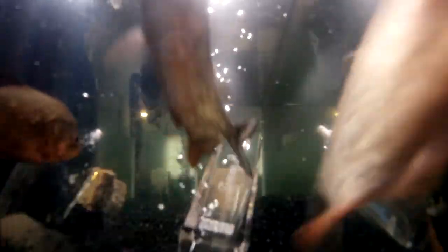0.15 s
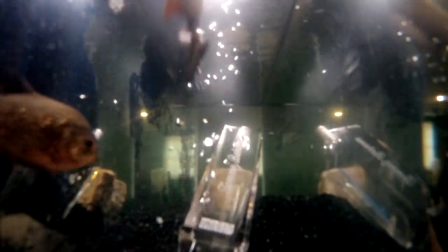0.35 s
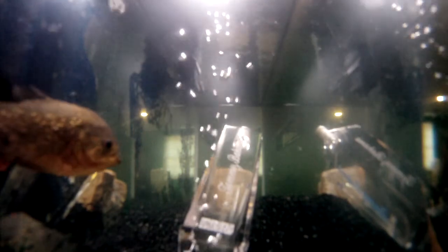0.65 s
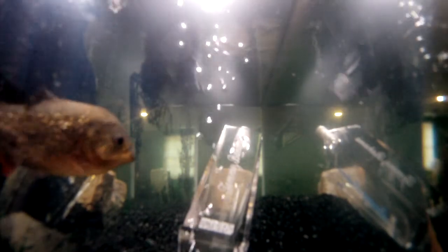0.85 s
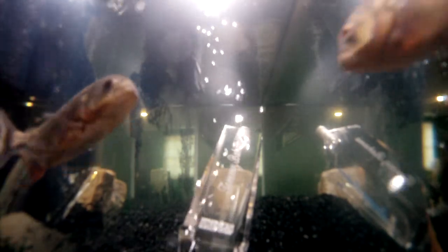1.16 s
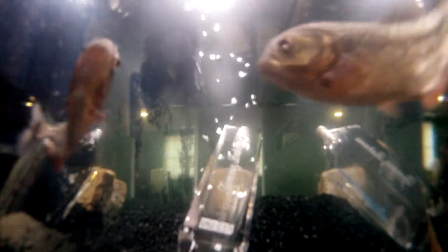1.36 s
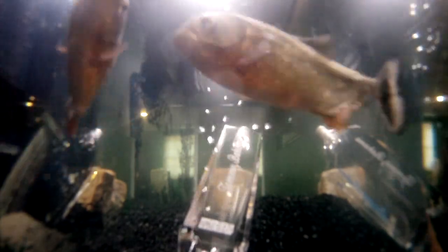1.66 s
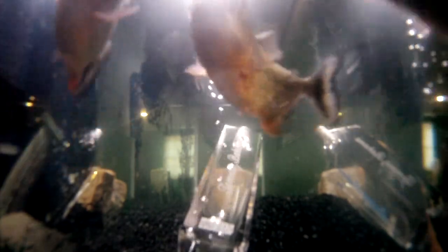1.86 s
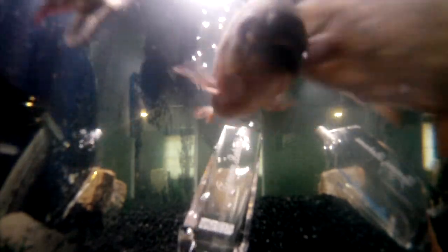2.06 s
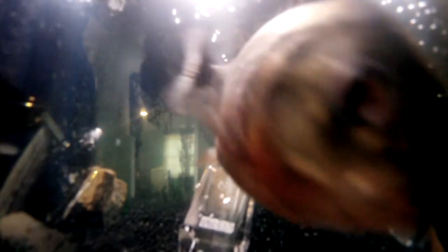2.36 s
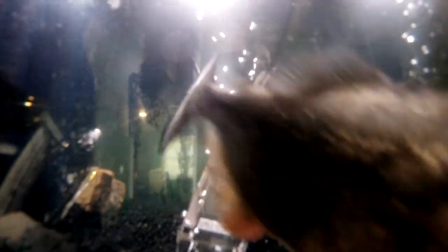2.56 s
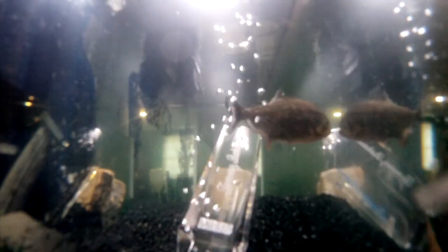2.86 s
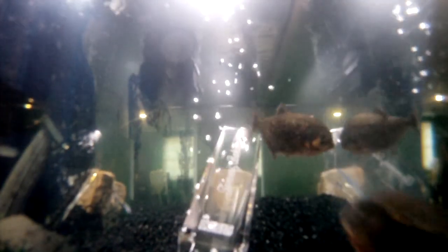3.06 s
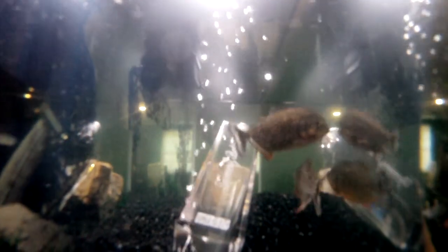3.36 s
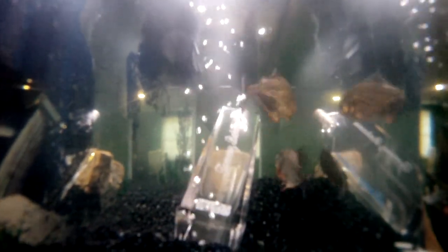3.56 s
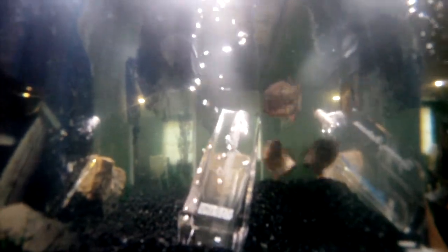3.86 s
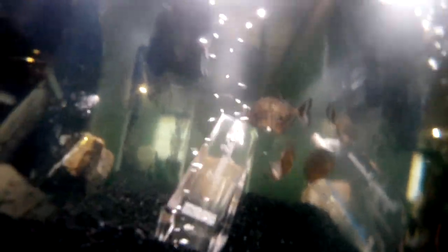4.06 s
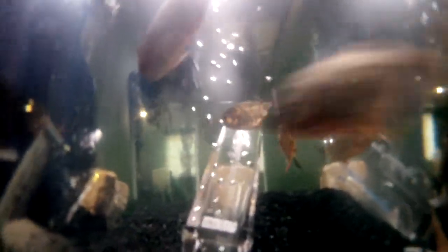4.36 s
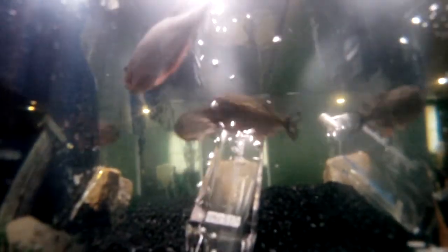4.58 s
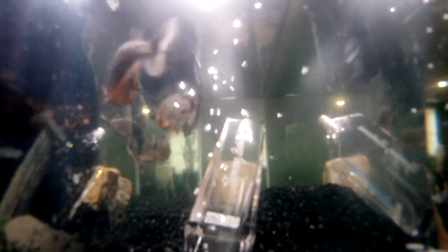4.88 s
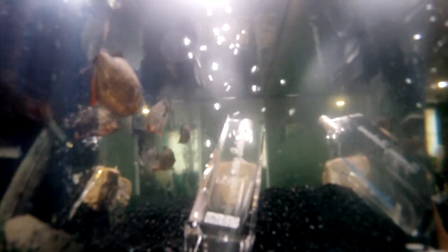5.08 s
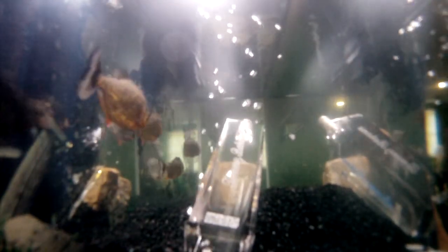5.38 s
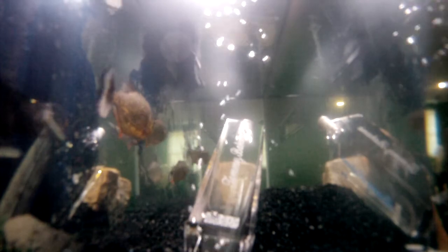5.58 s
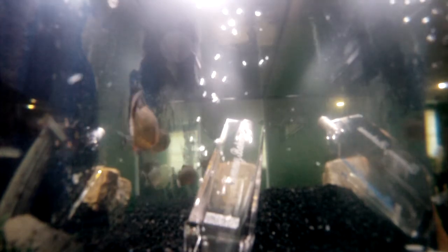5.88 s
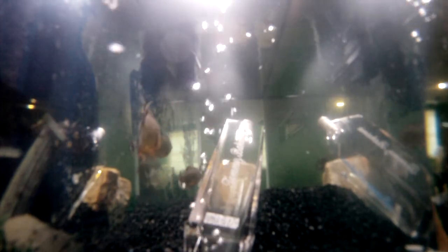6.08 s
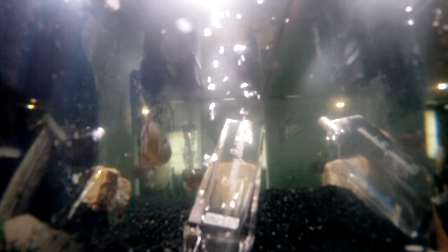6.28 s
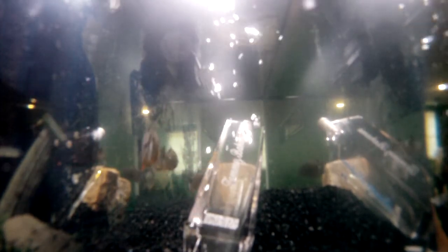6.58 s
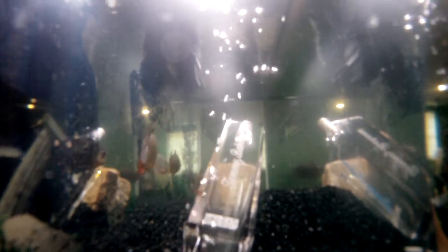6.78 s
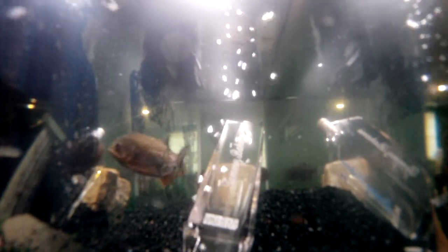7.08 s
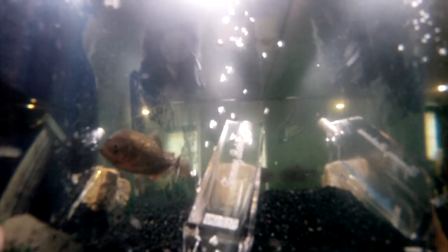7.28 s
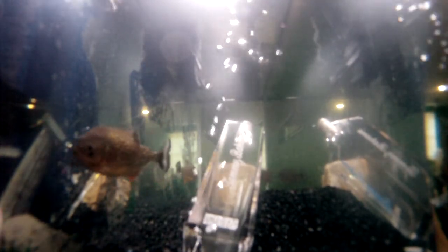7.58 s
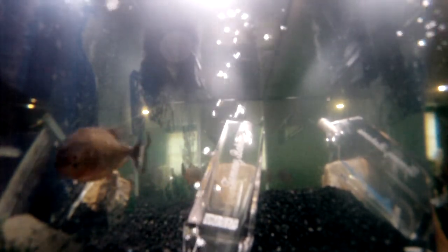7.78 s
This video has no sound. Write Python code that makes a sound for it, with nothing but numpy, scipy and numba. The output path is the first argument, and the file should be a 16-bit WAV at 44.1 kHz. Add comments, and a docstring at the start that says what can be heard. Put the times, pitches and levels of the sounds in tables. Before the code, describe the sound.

A pump motor drones continuously in an aquarium, its whine overlaid by dense dry ticking that swells and fades every second or so. Bubbles and flowing water form a murky bed. A small knock comes first, then scratchy rubs, bumps and a huge dull thud against the microphone case, followed by soft low thuds. The pump settles back to its steady rattling hum. Muffled, close, slightly distorted underwater pickup.

```python
"""A steady hum and six-vane impeller whine run throughout, with a loose rotor ticking once a turn.
The microphone hangs in a sealed housing in the fish tank, with the induction-motor pump running.
The hum and whine are sines locked to mains and rotor; ticks, knocks and bubbles are ringing modes; flow is noise.
Midway the housing is bumped and rubbed. Some loud ticks add a bright overload click, fast gain control
ducks after each peak, and a sample-hold puts mirror images of the sound high up."""
import sys
import numpy as np
from scipy import signal
from scipy.fft import rfft, irfft
from scipy.io import wavfile
from numba import njit

SR = 44100
rng = np.random.default_rng(int(sys.argv[2]) if len(sys.argv) > 2 else 0)


def unload_wav(signal):
    """Save mono or channel-first audio to the path in sys.argv[1] as 16-bit WAV at rate SR, clipped to [-1, 1]."""
    wavfile.write(
        sys.argv[1],
        SR,
        np.round(np.clip(np.atleast_2d(signal).T, -1, 1) * 32767).astype(np.int16),
    )


def voltage_ratio(decibels):
    """Convert decibels (scalar or array-like) to amplitude ratios, 20 dB per decade."""
    exponent = np.asarray(decibels, float) / 20
    return 10 ** exponent


N = 349697
TIME = np.arange(N) / SR   # s

# Every level below is set ahead of the recorder's filters and gain control.
# Rotor speed, with a brief sag after the big knock: start_s, speed_turns_per_s
ROTOR_SPEED = [(0, 52.7384), (4.03, 52.732), (4.28, 52.5245), (4.55, 52.7715), (7.93, 52.7491)]
# Steady tones of rotor and magnetic pull: turn_rate_multiple, pull_rate_multiple
TONE_ORDERS = [(0, 1 / 2), (0, 1), (0, 3 / 2), (0, 2), (0, 3), (0, 4), (1, 2), (6, 0), (6, 1), (12, 0),
               (12, 1), (13, 0), (18, 0), (18, 1), (19, 0), (23, 0), (24, 0), (24, 1), (25, 0), (25, 1),
               (26, 1), (27, 0), (28, 0), (30, -1), (30, 0), (35, 0), (36, 0), (36, 1), (48, 0), (49, 0),
               (54, 0), (55, 0), (60, 0)]
# Mean level of each steady tone: level_db (rms)
TONE_LEVELS = [-30, -18.5, -31.5, -32, -30, -42.5, -40, -25.5, -43, -17.5, -41.5, -40, -32.5, -39.5, -40.5,
               -40.5, -23, -34.5, -32, -29.5, -50.5, -40, -52, -45.5, -33, -60, -27, -37, -42, -49, -55.5,
               -55, -54]
# Tones that fade while the housing is handled:
# start_s, change_of_turn_order_6_and_pull_harmonic_3_db, change_of_turn_order_12_db
HANDLING_FADES = [(3.05, 0, 0), (3.2, -4, -1), (3.38, -2, -1), (3.55, -13.5, -9.5), (3.8, -3, -2.5),
                  (4.0, -3.5, -2), (4.3, -30, -1), (4.55, -4.5, -2.5), (4.85, -1, -0.5)]
# Tick strength round one slip cycle: slip_cycles, strength_db
TICK_STRENGTH = [(.2, -15.5), (.3, -11.5), (.39, -4.5), (0.481, -8), (.56, -19.5), (.66, -11.5), (.78, -2),
                 (.88, -16.5), (.97, -8.5), (1.1, -23), (1.2, -33.5)]
# The hardest ticks; some overload the recorder, adding a bright click (-30 dB is next to none):
# start_s, strength_db, overload_click_db
HARD_TICKS = [(.0624, -3.5, -3), (.1954, -2.5, -30), (.4038, -3.5, -30), (.8209, -3, -7), (1.2552, -3, -30),
              (1.5795, -3.5, -30), (1.9206, -2, -16), (2.3375, -1.5, -18), (3.0962, -4, -30),
              (3.1139, -2.5, -9), (3.4376, -4, -14), (3.5708, -3, -30), (3.6462, -1.5, -14),
              (3.7034, -4.5, -30), (4.0796, 4, 3), (4.4628, -.5, 3), (4.5556, -2.5, -30), (4.6712, -2, -12),
              (4.8797, -2.5, -3), (4.9724, -3.5, -30), (5.1055, -3, -30), (5.2212, -2, -30),
              (5.2966, -2, -6), (5.3892, -3.5, -30), (5.4294, -3.5, -30), (5.5051, -3, -30),
              (5.7308, -2, -11), (5.9217, 0, -6), (6.1473, -2, -30), (6.2632, -3, -2), (6.6047, -3, -30),
              (6.68, -3, -30), (7.0216, -2.5, -14), (7.5714, -1.5, -8), (7.6468, -2.5, -30),
              (7.7797, -2.5, -30), (7.8554, -2.5, -30)]
# Modes a tick sets ringing: pitch_hz, t60_s
TICK_RING_MODES = [(1910, .012), (2140, .006), (2510, .011), (1450, .016), (3200, .007), (3666, .009)]
# Weight of each tick mode: level_db
TICK_MODE_LEVELS = [4, -11, -9, 1, -1.5, -8]
# Hard knocks on the housing: start_s, strength_db, pitch_hz, contact_s, snap_db
HARD_KNOCKS = [(2.5203, 0, 410, 0.0014, -52), (3.1153, 0.5, 577, 0.0027, -37),
               (3.1313, 2.5, 740, 0.00024, -10), (4.0313, 26, 632, 0.0044, -14),
               (4.0395, 19, 75.4, .006, -30)]
# Soft pushes on the housing: start_s, strength_db, pitch_hz
SOFT_THUDS = [(2.518, -5.5, 150), (3.1451, -5.5, 148), (3.3, -5.5, 100), (3.387, -8, 204), (3.427, -9, 298),
              (4.062, 5, 262), (4.151, 0, 89.5), (4.276, -15, 240), (4.338, -12, 115), (4.439, -12, 90.5)]
# Rubbing on the housing: start_s, strength_db
RUBS = [(3.063, -19), (3.088, -23), (3.105, -28), (3.127, 0.5), (3.156, -22), (3.278, -15), (3.345, -22),
        (3.386, -8.5), (3.55, -9), (3.582, -11), (3.63, -19)]
# Low rumble, louder while the housing is handled: start_s, level_db (rms)
HANDLING_RUMBLE = [(3.05, -42), (3.15, -30), (4.5, -29), (4.7, -49)]
# Flow through the tank and housing resonances: pitch_hz, width_hz, level_db (relative)
FLOW_RESONANCES = [(73, 52, -4), (274, 194, -3), (781, 218, -5.5), (1464, 486, -6.5), (1948, 460, -5.5),
                   (2503, 335, -12.5), (3596, 300, -23.5)]

PULL_HZ, PULL_START_CYCLES = 119.982, -.443   # magnetic pull, at twice the mains
START_TURNS = .0072
# The rotor strikes earlier in its turn as the pull slips ahead (turns; lead is turns per slip cycle)
TICK_ANGLE, TICK_LEAD, TICK_JITTER = .423, .285, .005
TICK_SPREAD_DB, TICK_TOP_DB = 3, -5
OVERLOAD_DELAY_S, OVERLOAD_LOW_CUT_HZ = .0012, 3000
KNOCK_T60_S = .0083
THUD_SWELL_CYCLES, THUD_T60_CYCLES = .73, 4.4
FLOW_DB, BUBBLES_DB, HISS_DB = -24, -25, -44   # rms
BUBBLES_PER_S = 580
HOLD_HZ, HOLD_STEPS = 12000, 4   # each held sample is repeated four times


def rms_one(x):
    """Scale to rms 1."""
    return x / np.sqrt(np.mean(x ** 2) + 1e-20)


def in_time(rows):
    """Columns of a curve table, interpolated at every sample."""
    start_s, *columns = np.transpose(rows)
    return [np.interp(TIME, start_s, column) for column in columns]


def drift(rate_hz):
    """Slow random wander of spread 1, from noise through two equal poles at a 40th of the sample rate."""
    r = np.exp(-80 * np.pi * rate_hz / SR)
    noise = rng.standard_normal(N // 40 + 2002)
    slow = signal.lfilter([1], [1, -2 * r, r * r], noise)[2000:]   # settled part
    return np.interp(np.arange(N) / 40, np.arange(len(slow)), rms_one(slow))


def ring(clicks, hz, t60):
    """Damped resonance: a unit click sets a sine of height 1 ringing."""
    r = voltage_ratio(-60 / (t60 * SR))
    w = 2 * np.pi * hz / SR
    return signal.lfilter([0, np.sin(w)], [1, -2 * r * np.cos(w), r * r], clicks + 1e-18)


def cut(x, hz, kind, order):
    """Butterworth low-, high- or band-pass."""
    return signal.sosfilt(signal.butter(order, hz, kind, fs=SR, output="sos"), x)


def motor_tones(turns, pull, fade_db):
    """Hum and impeller whine: sines locked to rotor and magnetic pull, each wavering slightly in level."""
    out = 0
    for (order, multiple), db in zip(TONE_ORDERS, TONE_LEVELS):
        level_db = db + fade_db.get((order, multiple), 0) + drift(7.3)
        cycles = order * turns + multiple * pull + rng.random()
        out = out + np.sqrt(2) * voltage_ratio(level_db) * np.cos(2 * np.pi * cycles)
    return out


def place_soft_ticks(turns, pull):
    """One strike a turn, its moment and strength set by how far the pull has slipped ahead."""
    slip_cycles, strengths_db = np.transpose(TICK_STRENGTH)
    whole = np.arange(int(turns[-1]))
    slip = (np.interp(whole + 1 / 3, turns, pull - 2 * turns) - .2) % 1 + .2
    angle = TICK_ANGLE - TICK_LEAD * slip + TICK_JITTER * rng.standard_normal(len(whole))
    start_s = np.interp(whole + angle, turns, TIME)
    strength_db = np.interp(slip, slip_cycles, strengths_db)
    strength_db = strength_db + TICK_SPREAD_DB * rng.standard_normal(len(whole))
    return start_s, np.minimum(strength_db, TICK_TOP_DB)


def rotor_ticks(turns, pull):
    """Each strike of the loose rotor skids for a few cycles, swelling the ringing modes."""
    soft_s, soft_db = place_soft_ticks(turns, pull)
    hard_s, hard_db, _ = np.transpose(HARD_TICKS)
    # a listed hard tick replaces any soft one within 6 ms
    free = np.abs(soft_s[:, None] - hard_s).min(axis=1) > .006
    at = (np.r_[hard_s, soft_s[free]] * SR).astype(int)
    strength_db = np.r_[hard_db, soft_db[free]]
    ringing = 0
    for (hz, t60), mode_db in zip(TICK_RING_MODES, TICK_MODE_LEVELS):
        clicks = np.zeros(N)
        clicks[at] = voltage_ratio(strength_db + mode_db + 1.34 * rng.standard_normal(len(at)))
        ringing = ringing + ring(clicks, hz, t60)
    t = TIME[:80] - TIME[40]
    skid = np.hanning(len(t)) * np.cos(2 * np.pi * 2100 * t) * 4 / len(t)
    skid[36] += .1   # a little of the contact is a hard edge
    return cut(np.convolve(ringing, skid)[:N], 3600, "low", order=3)


def overload_clicks():
    """Some loud ticks overload the recorder: each adds a bright click, a high-passed impulse."""
    hard_s, _, overload_click_db = np.transpose(HARD_TICKS)
    clicks = np.full(N, 1e-18)
    clicks[((hard_s + OVERLOAD_DELAY_S) * SR).astype(int)] = voltage_ratio(overload_click_db)
    return cut(clicks, OVERLOAD_LOW_CUT_HZ, "high", order=2)


def blow(t, hz, contact, t60):
    """A ring that swells while the contact lasts, then dies."""
    swell = np.minimum(t / contact, 1)
    decay = voltage_ratio(-60 * np.maximum(t - contact, 0) / t60)
    return swell * decay * np.sin(2 * np.pi * hz * t)


def housing():
    """Knocks and pushes ring the housing, knocks also snap; rubbing gives rumble and gritty noise puffs."""
    rumble_db, = in_time(HANDLING_RUMBLE)
    rumble = cut(cut(rng.standard_normal(N), 230, "low", order=2), 62, "high", order=2)
    out = voltage_ratio(rumble_db + drift(2.9)) * rms_one(rumble)
    t = TIME[:SR // 10]
    for s, strength_db, hz, contact, snap_db in HARD_KNOCKS:
        snap = cut(rng.standard_normal(len(t)), 900, "high", order=1) * voltage_ratio(-60 * t / .026)
        knock = voltage_ratio(strength_db) * blow(t, hz, contact, KNOCK_T60_S)
        out[round(s * SR):][:len(t)] += knock + voltage_ratio(snap_db) * snap
    for s, strength_db, hz in SOFT_THUDS:
        thud = blow(t, hz, THUD_SWELL_CYCLES / hz, THUD_T60_CYCLES / hz)
        out[round(s * SR):][:len(t)] += voltage_ratio(strength_db) * thud
    for s, strength_db in RUBS:
        envelope = np.minimum(t / .0028, 1) * voltage_ratio(strength_db - 60 * t / .027)
        grit = rng.standard_normal(len(t)) * envelope
        puff = cut(grit, [3300, 4000], "band", order=1) + .13 * cut(grit, 1600, "high", order=2)
        out[round(s * SR):][:len(t)] += puff
    return out


def flow():
    """Rush of water: noise shaped by the resonances of tank and housing."""
    hz = np.fft.rfftfreq(N, 1 / SR)
    power = 0
    for pitch_hz, width_hz, db in FLOW_RESONANCES:
        power = power + voltage_ratio(db) ** 2 / (1 + (2 * (hz - pitch_hz) / width_hz) ** 2) ** 2
    rush = irfft(rfft(rng.standard_normal(N)) * np.sqrt(power), N)
    return voltage_ratio(FLOW_DB + drift(6.6)) * rms_one(rush)


def bubbles():
    """A random stream of bubbles of twelve pitches, each ring falling 60 dB in sixty cycles."""
    clicks = voltage_ratio(3.1 * rng.standard_normal(N)) * (rng.random(N) < BUBBLES_PER_S / SR)
    dealt = rng.integers(0, 12, N)   # which pitch each bubble takes
    pitches_hz = 555 * voltage_ratio(np.linspace(-1.0, .7, num=12))
    stream = sum(ring(clicks * (dealt == k), hz, 60 / hz) for k, hz in enumerate(pitches_hz))
    stream = cut(cut(stream, 970, "low", order=4), 630, "high", order=2)
    return voltage_ratio(BUBBLES_DB + drift(1)) * rms_one(stream)


def microphone_hiss():
    """The microphone's own hiss: steady white noise."""
    return voltage_ratio(HISS_DB) * rng.standard_normal(N)


def scene():
    """Pump, housing and water at the microphone, with its hiss and the overload clicks."""
    turns = START_TURNS + np.cumsum(in_time(ROTOR_SPEED)[0]) / SR
    pull = PULL_START_CYCLES + PULL_HZ * TIME
    low_db, vane_db = in_time(HANDLING_FADES)
    fade_db = {(6, 0): low_db, (0, 3): low_db, (12, 0): vane_db}
    pump = motor_tones(turns, pull, fade_db) + rotor_ticks(turns, pull)
    return (pump + overload_clicks() + housing() + flow() + bubbles() + microphone_hiss())[None]


@njit
def gain_control(x, ceiling, attack, release, glide):
    """The log gain is pushed down while output is over the ceiling, creeps back, and follows smoothly."""
    out, aim, duck = np.empty_like(x), 0., 0.
    for i in range(len(x)):
        out[i] = x[i] * np.exp(-duck)
        aim += attack * (abs(out[i]) > ceiling) - release * aim
        duck += glide * (aim - duck)
    return out


def sample_hold(x):
    """Sampling copies the band round the hold rate; repeating each sample tilts and notches the spectrum."""
    sampled = x * (1 + 2 * np.cos(2 * np.pi * HOLD_HZ * TIME))
    hz = np.fft.rfftfreq(N, 1 / SR)
    response = np.sinc(hz / HOLD_HZ) / np.sinc(hz / HOLD_HZ / HOLD_STEPS)
    return cut(irfft(rfft(sampled) * response, N), 14900, "low", order=30)


def low_pass(x):
    """Removes everything above the highest recorded frequency."""
    return signal.sosfilt(signal.butter(12, 15850, fs=SR, output="sos"), x)


def record(dry):
    """The recorder: low cut, gain control, band limit, overload, then sample-hold with its mirror images."""
    x = cut(dry[0], 35, "high", order=1)
    x = gain_control(x, 0.67, 600 / SR, 9.0 / SR, 1500 / SR)   # the last three are rates per second / SR
    x = np.clip(cut(x, 5450, "low", order=20), -1, 1)
    mix = np.clip(sample_hold(x), -1, 1)[None]
    return low_pass(mix)


dry = scene()
out = record(dry)
unload_wav(out)
```